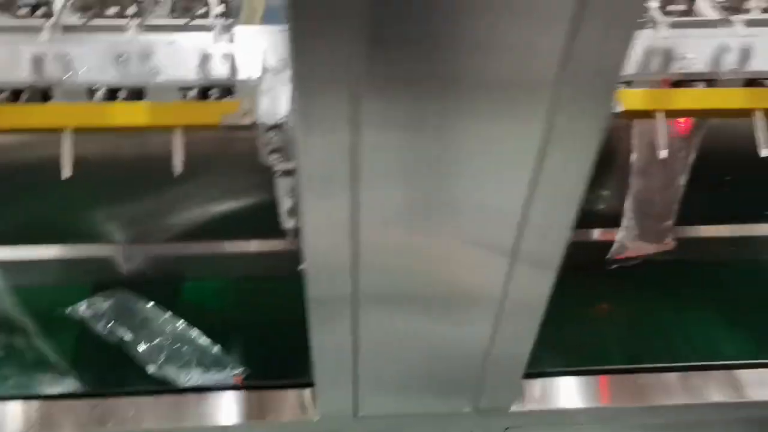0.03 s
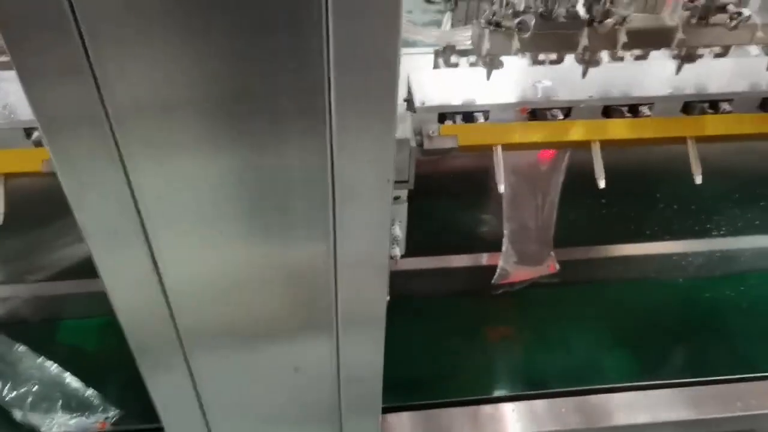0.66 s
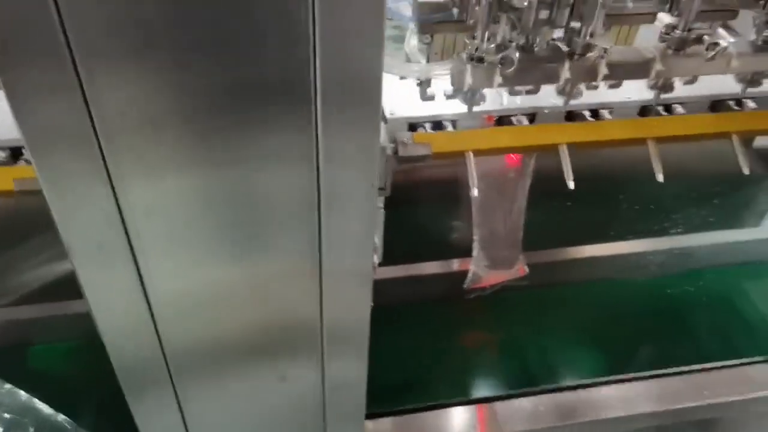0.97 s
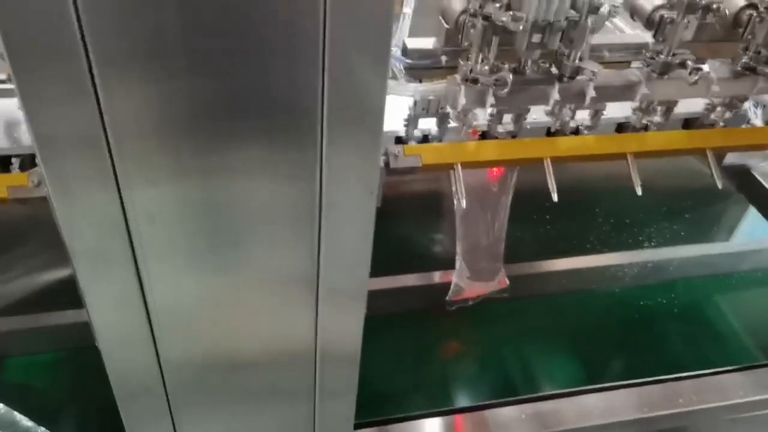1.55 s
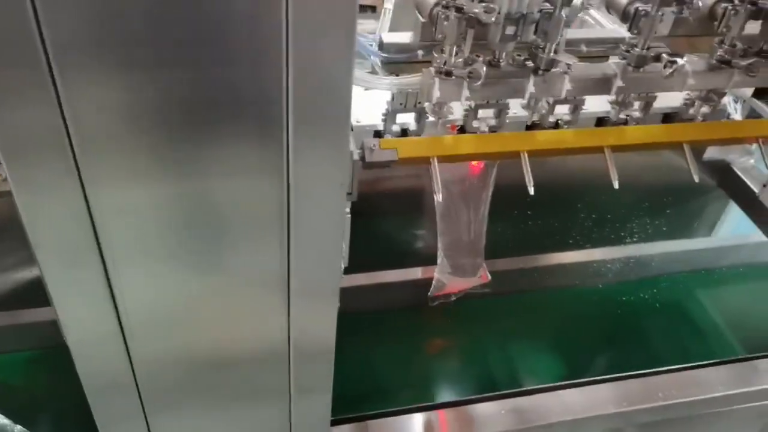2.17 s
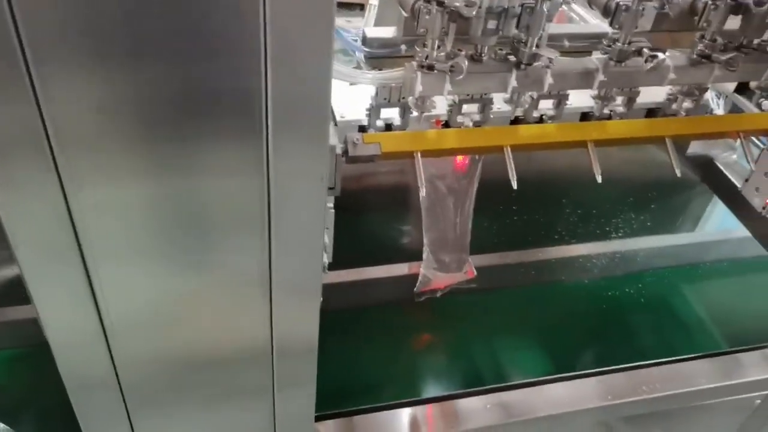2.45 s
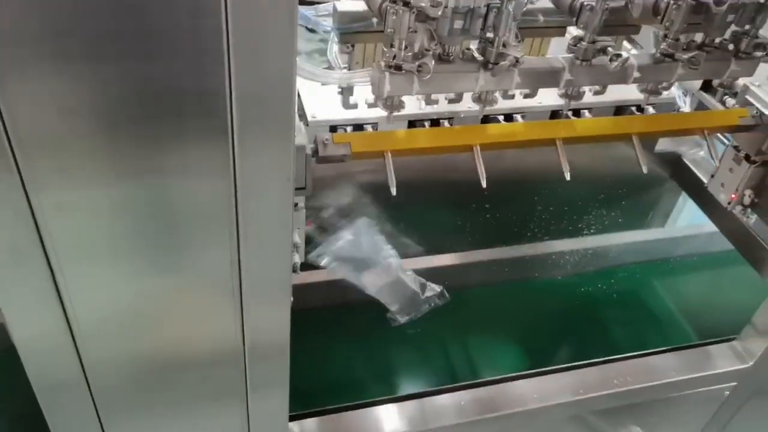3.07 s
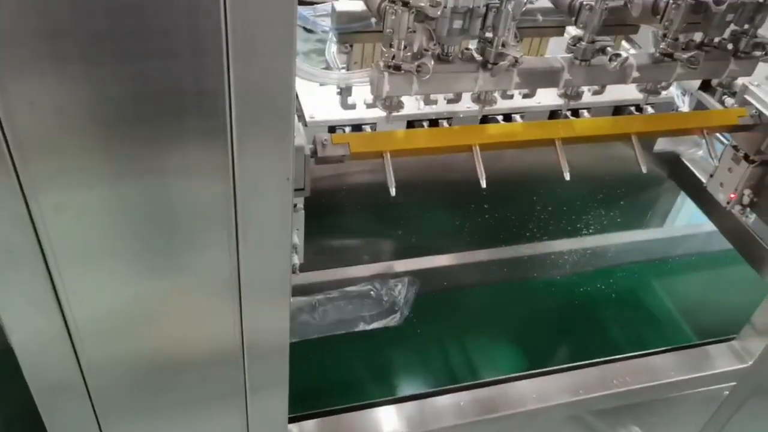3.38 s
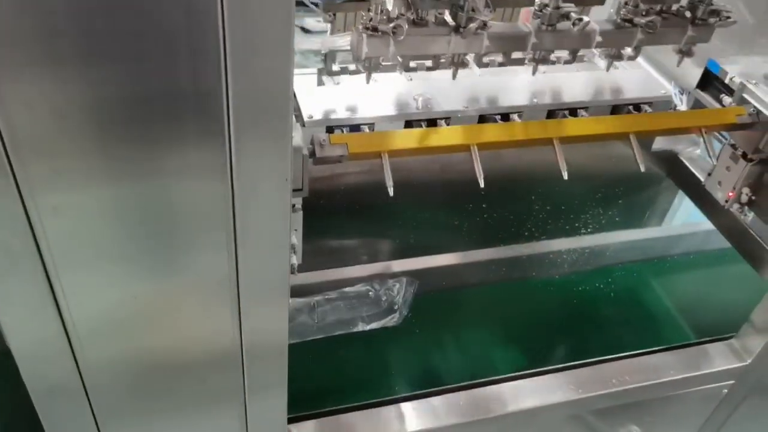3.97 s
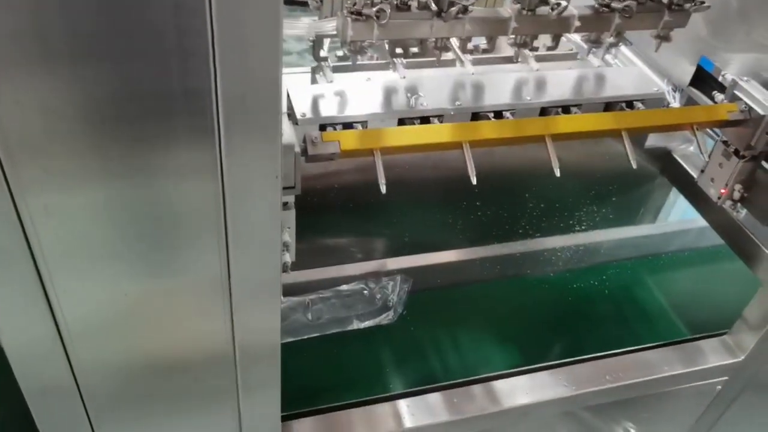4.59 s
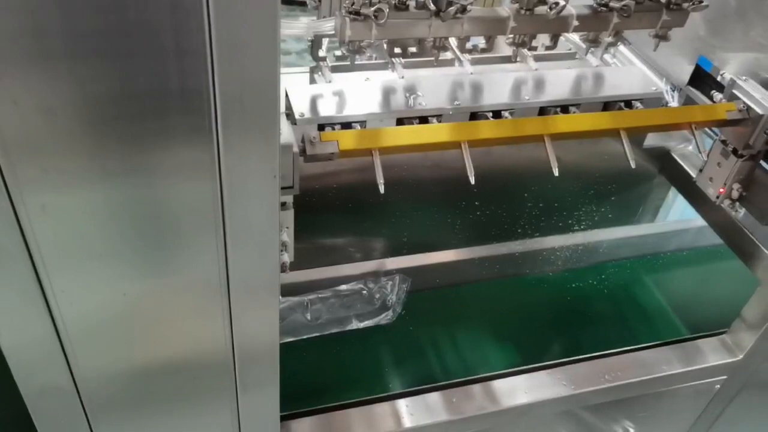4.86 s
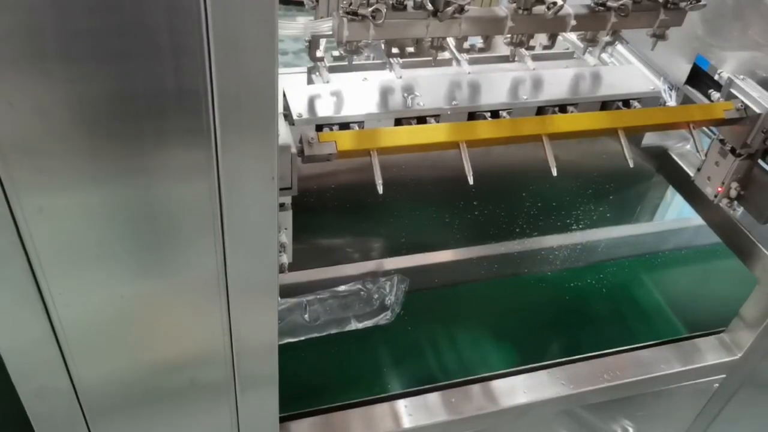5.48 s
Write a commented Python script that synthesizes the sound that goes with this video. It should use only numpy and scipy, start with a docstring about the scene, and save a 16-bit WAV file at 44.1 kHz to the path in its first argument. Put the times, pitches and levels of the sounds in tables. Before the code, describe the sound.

Close to a bag sealing machine in a factory, quick puffs of air cut through an electric hum and a thinly whistling leak. Jaws clank and thud shut as cylinders vent. After more air bursts and clacks, a slide rasps back and the hum and leak die away. A full plastic bag thumps and crinkles onto a belt, then a low motor rises and drops over the steady hall noise.

```python
"""A pneumatic machine fills and seals a plastic bag, heard in mono beside its steel cabinet in a noisy hall.
Its coils hum, its frame rumbles and air leaks and whistles, while valves puff, cylinders vent and the
jaws clank. A slide rasps back as the machine lets go, and hum and leak die away.
The full bag flops onto the conveyor belt, then a motor swells briefly."""
import sys
import numpy as np
from scipy import signal
from scipy.fft import rfft, irfft, next_fast_len
from scipy.io import wavfile
from scipy.ndimage import map_coordinates

SR = 44100
rng = np.random.default_rng(int(sys.argv[2]) if len(sys.argv) > 2 else 0)


def master(y):
    """Save y as 16-bit WAV."""
    cut = np.clip(np.atleast_2d(y).T, -1, 1)
    pcm = np.round(cut * 32767)  # scale
    wavfile.write(sys.argv[1], SR, pcm.astype(np.int16))


N = 248283


def amp(db):
    return 10 ** (np.asarray(db) / 20)


def unit(x):
    return x / np.sqrt(np.mean(x ** 2) + 1e-20)


def clock():
    return np.arange(N) / SR


def along(points, hz):
    """Read a curve of (frequency, value) points on a log frequency axis."""
    f, v = np.transpose(points)
    return np.interp(np.log(hz + 1), np.log(f + 1), v)


def wobble(rate):
    """Smooth random modulation, rate knots a second."""
    knots = rng.standard_normal(int(N * rate / SR) + 4)
    return map_coordinates(knots, [clock() * rate])


def filtered(x, response):
    """EQ x with a gain that is a function of frequency."""
    size = next_fast_len(N + 8192)
    return irfft(rfft(x, size) * response(np.fft.rfftfreq(size, 1 / SR)), size)[:N]


def noise(colour):
    """Noise of rms 1 with a (Hz, dB) spectrum, rippled by standing waves between the steel walls."""
    knots = rng.standard_normal(SR // 60)
    depth_db = [(200, 0), (900, 1.5), (3500, 1.5), (6000, 1)]
    ripple = lambda f: along(depth_db, f) * map_coordinates(knots, [f / 35])  # a knot every 35 Hz
    low_cut = lambda f: np.minimum(f / colour[0][0], 1) ** 2
    return unit(filtered(rng.standard_normal(N), lambda f: amp(along(colour, f) + ripple(f)) * low_cut(f)))


def resonant_noise(peaks, order=1):
    """Noise of rms 1 through (Hz, width, dB) resonances; a higher order has steeper skirts."""
    band = lambda f, hz, width: 1j * f * width / (hz * hz - f * f + 1j * f * width)
    body = lambda f: sum(amp(db) * band(f, hz, width) ** order for hz, width, db in peaks)
    return unit(filtered(rng.standard_normal(N), body))


def burst(start, t60, hold=0, attack=0.0012):
    """An envelope that opens, holds and dies away; all times in seconds."""
    t = np.maximum(clock() - start, 0)
    return (1 - np.exp(-t / attack)) * np.exp(-np.log(1000) * np.maximum(t - hold, 0) / t60)


def ring(start, modes, attack):
    """Strike (Hz, dB, t60) modes, in a slightly new balance each hit, starting near rms 1."""
    t = np.arange(SR) / SR
    out = np.zeros(N + SR)
    size = np.sqrt(sum(amp(db) ** 2 for _, db, _ in modes) / 2)
    for hz, db, t60 in modes:
        envelope = (1 - np.exp(-t / attack)) * np.exp(-np.log(1000) * t / t60)
        out[round(start * SR):][:SR] += amp(db + rng.normal(0, 1)) * envelope * np.sin(2 * np.pi * hz * t)
    return out[:N] / size


def harmonics(hz, lines):
    """A stack of (multiple, dB) sines on a pitch that may glide."""
    turns = np.cumsum(hz) / SR
    return np.sqrt(2) * sum(amp(db) * np.sin(2 * np.pi * (k * turns + rng.random())) for k, db in lines)


def shade(loss_db, clear_s=0.73):
    """Gain that rises to 1 as the microphone comes out from behind the cabinet."""
    return amp(-loss_db * np.exp(-clock() / clear_s))


def working(t60, let_go_s=2.878):
    """Full while the machine holds the bag, dying away once it lets go."""
    return np.exp(-np.log(1000) * np.maximum(clock() - let_go_s, 0) / t60)


def hum_level():
    """Envelope of the coils' buzz."""
    return amp(-30.5) * shade(loss_db=7) * working(t60=0.39)


# Partials of the coil buzz: (multiple of the buzz pitch, level [dB])
HUM_PARTIALS = [(1, 0), (1.5, -13), (2, -14.5), (3, -4), (3.5, -19.5), (4, -22)]

def hum():
    """Coils buzz at twice the mains rate until the machine lets go."""
    buzz_hz = 100 + 0.27 * wobble(5.36)
    return hum_level() * amp(0.82 * wobble(6.45)) * harmonics(buzz_hz, HUM_PARTIALS)


# Movements that shake the frame: (time [s], hold [s], level [dB])
FRAME_SHAKES = [(0.626, 0.24, -39), (1.068, 0.22, -27), (1.56, 0.053, -36), (2.05, 0.86, -35),
                (3.047, 0.78, -37), (5.247, 0.2, -36)]
# Low end of the shaking frame: (frequency [Hz], level [dB per Hz])
RUMBLE_EQ = [(25, -12), (42, -13), (55, -14), (68, -5.5), (85, -1), (115, 1.5), (150, 0), (200, -4.5),
             (270, -10), (350, -15.5), (500, -26.5), (900, -78)]
# Droning panel resonances: (frequency [Hz], width [Hz], level [dB])
DRONE_PEAKS = [(81.8, 3.2, -3), (148, 8.7, 2.5), (413, 4.3, -11)]

def rumble():
    """Each movement adds its power to the frame's idle rumble; the panels drone while the machine hums."""
    idle = amp(-39) * shade(loss_db=11)
    moves = [amp(db) * burst(s, t60=2.35, hold=hold, attack=0.017) for s, hold, db in FRAME_SHAKES]
    shake = np.sqrt(idle ** 2 + sum(move ** 2 for move in moves))
    drone = amp(-5.5) * np.sqrt(shake * hum_level()) * resonant_noise(DRONE_PEAKS)
    return shake * noise(RUMBLE_EQ) + drone


# The hall's noise bed: (frequency [Hz], level [dB per Hz])
HALL_EQ = [(210, 3), (350, 0.5), (700, -11), (1000, -7), (1220, -11.5), (1500, -7), (2250, -0.5),
           (2750, -7.5), (3200, -6.5), (3770, -12), (4900, -8), (5550, 1), (7100, -3), (8350, 3),
           (9300, -8), (10400, -13), (11400, -25), (13200, -24.5), (14000, -36)]
# Whines of other machines: (frequency [Hz], width [Hz], level [dB])
WHINE_PEAKS = [(815, 65, -4.5), (958, 26, -2.5), (1429, 25, 2.5), (1669, 30, 2), (1990, 9.7, -11),
               (2232, 40, 6), (5600, 110, -6)]

def hall():
    """A bed of factory noise, fluttering slightly, with other machines whining in it."""
    bed = amp(-37 + 0.42 * wobble(4.214) + 0.94 * wobble(25)) * noise(HALL_EQ)
    return bed + amp(-52) * resonant_noise(WHINE_PEAKS)


# Bright hiss of the leak: (frequency [Hz], level [dB per Hz])
LEAK_EQ = [(300, -27), (600, -11), (1200, -8), (2200, 0), (2700, -2), (3300, -1), (4200, -3.5), (5600, 3.5),
           (6300, 4), (7300, 0.5), (8500, 6), (9200, -18), (10500, -45), (11600, -59), (14000, -52)]

def leak():
    """Air leaks with a flickering hiss until the machine lets go."""
    return amp(-30 + 1.7 * wobble(18)) * shade(loss_db=0.5) * working(t60=0.75) * noise(LEAK_EQ)


# Whistles of the fittings: (start [s], end [s], frequency [Hz], width [Hz], level [dB])
FITTING_WHISTLES = [(-.3, 1.1, 4858, 30, -42), (1.3, 2.6, 4865, 50, -47), (1.2, 2.4, 6230, 90, -42.5),
                    (1.3, 2.9, 8058, 50, -38.5), (1.9, 3, 8510, 70, -40), (.2, 1.6, 3008, 30, -51)]

def whistles():
    """The air fittings whistle in turn as pressure shifts: narrow bands of hiss that swell and fade."""
    out = np.zeros(N)
    for start, end, hz, width, db in FITTING_WHISTLES:
        swell = np.sin(np.pi * np.clip((clock() - start) / (end - start), 0, 1))
        out += amp(db) * swell * resonant_noise([(hz, width, 0)])
    return out


# Valve exhaust cues: (time [s], attack [s], hold [s], level [dB], t60 [s], muffler name)
VALVE_PUFFS = [(.057, .002, 0.013, -26, 0.52, "hissing"), (.1415, 0.0018, 0.021, -20.5, 0.36, "hissing"),
               (0.296, .0004, 0.051, -24.5, 0.2, "hissing"), (.411, .002, 0.013, -28.5, 1, "hissing"),
               (0.874, 0.0049, 0.046, -21, 0.35, "whistling")]
# Tone of the exhaust jet: (frequency [Hz], level [dB per Hz])
PUFF_EQ = [(800, -33), (1800, -13.5), (2700, -9), (3800, -11), (5100, -4.5), (5700, 5), (6500, 0.5),
           (7300, 0.5), (8200, 3.5), (9000, -4.5), (10500, -20), (11600, -40), (14000, -50)]
# Ring of the "hissing" and "whistling" mufflers: (frequency [Hz], width [Hz], level [dB])
MUFFLER_PEAKS = { "hissing": [(3050, 60, -7), (4120, 45, -.5), (4290, 45, -2), (4600, 45, -4),
                 (5670, 45, 2), (5890, 45, 2), (6250, 35, -1), (6520, 35, -1), (7620, 40, 1),
                 (8040, 40, 0)], "whistling": [(3010, 35, -1), (2780, 50, -3), (3330, 50, -2),
                 (3600, 45, -2), (3850, 50, -3.5), (5680, 45, 0), (6310, 45, 3), (6930, 30, 8.5),
                 (8540, 45, -1)], }

def puffs():
    """Each valve opens with a surge of extra flow and blows through its muffler, which rings."""
    jet = noise(PUFF_EQ) * amp(1.1 * wobble(160))
    out = np.zeros(N)
    for s, attack, hold, db, t60, muffler in VALVE_PUFFS:
        surge = 1 + 0.59 * burst(s, t60=0.057, attack=attack)
        blowing = burst(s, t60, hold, attack) * surge
        ringing = amp(-5) * burst(s, t60=0.22, hold=hold, attack=attack)
        out += amp(db) * (blowing * jet + ringing * resonant_noise(MUFFLER_PEAKS[muffler], order=2))
    return out


# Cylinder vent cues: (time [s], hold [s], jet level [dB], sizzle level [dB])
CYLINDER_VENTS = [(1.02, 0.042, -26.5, -55), (1.09, 0.069, -26.5, -35), (1.215, 0.135, -23, -45),
                  (2.125, .015, -43, -41), (2.17, 0.09, -54, -56), (2.615, 0.04, -26, -30),
                  (2.745, 0.115, -29.5, -47)]
# Body of the jet: (frequency [Hz], level [dB per Hz])
VENT_EQ = [(400, -5.5), (1300, -12), (2100, -3.5), (3000, -2.5), (4000, -5.5), (5200, 1.5), (6300, 3),
           (7300, 0.5), (8500, 6), (9500, -7), (11000, -17), (14000, -35)]
# Thin top edge of the jet: (frequency [Hz], level [dB per Hz])
SIZZLE_EQ = [(6000, -25), (8400, 10), (9400, 0), (10300, -1), (11100, -6), (11800, -21), (13300, -16),
             (14000, -20)]

def vents():
    """Cylinders dump their air as the jaws close and open: a broad jet with a sizzling edge."""
    jet = noise(VENT_EQ)
    sizzle = unit(noise(SIZZLE_EQ) * amp(2.5 * wobble(300)))
    out = np.zeros(N)
    for s, hold, jet_db, sizzle_db in CYLINDER_VENTS:
        out += burst(s, t60=0.55, hold=hold, attack=0.01) * (amp(jet_db) * jet + amp(sizzle_db) * sizzle)
    return amp(0.7 * wobble(49.13)) * out


# Hits of the jaws and grippers: (time [s], thud [dB], clang [dB], clack [dB], tick [dB])
JAW_HITS = [(1.0755, -35, -31, -14.5, -22), (1.086, -4, -25, -37, -37), (1.106, -30, -25, -25, -37),
            (1.112, -8, -38, -38, -40), (1.141, -8, -30, -36, -23.5), (1.157, -5.5, -49, -45, -42),
            (1.179, -2, -32, -44, -38), (1.498, -13, -37.5, -31, -27), (1.598, -10, -52, -48, -45),
            (1.626, -11, -55, -48, -45), (1.664, -14, -59, -48, -47), (2.145, -32, -42, -29, -21),
            (2.722, -30, -38, -27.5, -30), (2.763, -30, -33, -30, -26), (2.769, -32, -35, -29, -25),
            (2.783, -16, -50, -42, -42), (2.807, -32, -42, -34, -28), (2.817, -34, -41, -32, -33)]
# Dull thud of the damped sheet panels: (frequency [Hz], level [dB], t60 [s])
PANEL_MODES = [(82, -14, .12), (146, 0, .06), (185, -4, .045), (235, -10, .04), (335, -15, .05)]
# Long ring of the frame: (frequency [Hz], level [dB], t60 [s])
FRAME_MODES = [(403, 0, .9), (623, -2, .8), (771, -1, .7), (945, 0, .6), (993, -6, .5), (1006, 0, .65),
               (1240, -5, .5), (1515, 0, .8), (1755, -5, .8), (1975, -1.5, .8), (2090, -4, .8),
               (2520, -2, .8), (3252, -10, .7)]
# Short ring of the steel latch: (frequency [Hz], level [dB], t60 [s])
LATCH_MODES = [(2083, 0, .12), (2213, -4, .11), (2374, -1, .05), (2530, -6, .06), (2977, -4, .055),
               (3155, -7, .055)]
# Dark clang of the frame: (frequency [Hz], level [dB per Hz])
CLANG_EQ = [(150, 15), (330, 10), (550, 5), (1000, 3), (1500, 4), (2200, -1), (4000, -19), (8000, -45)]
# Sharp midrange clack: (frequency [Hz], level [dB per Hz])
CLACK_EQ = [(700, -10), (1800, -9.5), (2100, 0), (2500, -4.5), (3100, -6.5), (3800, -16), (8000, -25),
            (14000, -55)]
# Bright tick, also the tone of the bag's crackle: (frequency [Hz], level [dB per Hz])
TICK_EQ = [(2000, -22), (4500, -10), (6000, 3), (7400, -4), (8500, 9), (9500, -7.5), (11500, -13.5),
           (14000, -32)]

def jaws():
    """Each hit thuds in the panels, rings the latch and clangs in the frame, which rings on as they shut."""
    clang, clack, tick = noise(CLANG_EQ), noise(CLACK_EQ), noise(TICK_EQ)
    rattle = amp(2.5 * wobble(180))  # loose parts chatter after the hit
    shut_s = JAW_HITS[2][0]
    out = amp(-28 + 2 * wobble(45)) * ring(shut_s, FRAME_MODES, attack=0.001)
    thuds = np.zeros(N)
    for s, thud_db, clang_db, clack_db, tick_db in JAW_HITS:
        thuds += amp(thud_db) * ring(s, PANEL_MODES, attack=0.0054)
        out += amp(clang_db) * rattle * clang * burst(s, t60=0.22)
        out += amp(clack_db) * clack * burst(s, t60=0.097, attack=0.0008)
        out += amp(clack_db - 7) * ring(s, LATCH_MODES, attack=0.002)
        out += amp(tick_db) * tick * burst(s, t60=0.06)
    low_cut = signal.butter(3, 97, "highpass", fs=SR, output="sos")  # panels radiate little deep bass
    return out + signal.sosfilt(low_cut, thuds)


# Bass boom of the cabinet: (frequency [Hz], level [dB per Hz])
BOOM_EQ = [(30, -45), (55, -28), (70, -3), (86, 7), (105, -33), (300, -120)]

def cabinet_boom():
    """The cabinet booms while the jaws press."""
    return amp(-34) * burst(1.17, t60=0.42, hold=0.37, attack=0.049) * noise(BOOM_EQ)


# Gripper cues: (time [s], knock level [dB], rub hold [s], rub level [dB])
STOP_HITS = [(2.135, -31, .03, -36.5), (2.8025, -15, 0.011, -27), (2.843, -29, .008, -41)]
# Resonances of the end stop: (frequency [Hz], width [Hz], level [dB])
STOP_PEAKS = [(373, 55, 1), (453, 64, -2), (531, 30, 2), (636, 32, 2.5), (710, 31, 5), (777, 42, 2.5),
              (1240, 40, -10), (1437, 35, -2)]

def end_stop():
    """The gripper knocks on its stop; the same resonances sound on as it rubs into the cushion."""
    modes = [(hz, db, np.log(1000) / (np.pi * width)) for hz, width, db in STOP_PEAKS]  # width to t60
    knocks = sum(amp(db) * ring(s, modes, attack=0.0015) for s, db, _, _ in STOP_HITS)
    rubbing = sum(amp(db) * burst(s, t60=0.2, hold=hold, attack=0.004) for s, _, hold, db in STOP_HITS)
    return knocks + rubbing * resonant_noise(STOP_PEAKS, order=2)


# Rasp of the slide on its rail: (frequency [Hz], width [Hz], level [dB])
SLIDE_PEAKS = [(504, 120, 7), (780, 130, -3), (1603, 140, 6.5), (2030, 82, 12.5), (2250, 63, 9.5),
               (2350, 67, -23)]

def slide():
    """A slide rubs back along its rail at an even speed, then stops."""
    stroke = burst(2.71, t60=0.32, hold=1, attack=0.033)
    return amp(-41 + 1.6 * wobble(40)) * stroke * resonant_noise(SLIDE_PEAKS)


# The bag's hits on the belt: (time [s], thump [dB], film slap [dB], snap [dB])
BAG_HITS = [(3.2626, -17.5, -35, -21.5), (3.2652, -31, -39, -30), (3.274, -13.5, -38, -26),
            (3.288, -24, -44, -44), (3.299, -21, -40, -44), (3.321, -18.5, -38, -44),
            (3.341, -28, -40, -38), (3.398, -27, -44, -40), (3.43, -30, -49, -45)]
# Low slosh of the filling: (frequency [Hz], width [Hz], level [dB])
FILLING_PEAKS = [(184, 31, -3), (238, 32, 8), (335, 28, 3), (368, 27, -5), (534, 90, -12), (746, 41, -15)]
# Thump of the belt: (frequency [Hz], level [dB], t60 [s])
BELT_MODES = [(145, -4, .07), (186, -2, .08), (236, 2, .11), (280, 2, .08), (333, 2, .09), (382, -5, .05),
              (450, -10, .04), (600, -15, .04)]
# Slap of the plastic film: (frequency [Hz], level [dB per Hz])
FILM_EQ = [(200, -7), (750, 0), (1200, -5.5), (1800, 0), (2600, 4.5), (3800, -6), (5500, 0), (7300, 3),
           (8500, 1), (9600, -4), (11500, -18), (14000, -34)]

def bag_landing():
    """The bag's foot brushes the belt, then it thumps down, its filling shaking and its film snapping."""
    brush = amp(-29.5) * burst(3.09, t60=0.33, hold=0.046, attack=0.008)
    jolt = amp(-30.5) * burst(BAG_HITS[1][0], t60=0.58, hold=0.073, attack=0.0041)
    out = (brush + jolt) * resonant_noise(FILLING_PEAKS, order=2)
    film = unit(noise(FILM_EQ) * amp(1.8 * wobble(500)))
    for s, thump_db, slap_db, snap_db in BAG_HITS:
        slap = amp(slap_db) * burst(s, t60=0.18)
        snap = amp(snap_db) * burst(s, t60=0.031, attack=0.00024)
        out += amp(thump_db) * ring(s, BELT_MODES, attack=0.0024) + (slap + snap) * film
    return out


# Folds of the film: (time [s], hold [s], level [dB])
BAG_FOLDS = [(3.294, 0.032, -30.5), (3.339, .004, -32)]
# Hollow ring of the bag's wall: (frequency [Hz], width [Hz], level [dB])
WALL_PEAKS = [(615, 50, -2), (740, 70, 4), (837, 74, -2)]

def bag_crumple():
    """The film crackles and the bag's wall rings as it folds over and lies down."""
    folding = sum(amp(db) * burst(s, t60=0.18, hold=hold, attack=0.002) for s, hold, db in BAG_FOLDS)
    crackle = unit(noise(TICK_EQ) * amp(1.8 * wobble(700)))
    return folding * (crackle + amp(-9.5) * resonant_noise(WALL_PEAKS, order=2))


# Fader moves for the motor's run: (time [s], shaft tone level [dB], overtone level [dB])
MOTOR_FADERS = [(4.45, -44, -47), (4.462, -49, -61), (4.5, -51, -42), (4.622, -45, -42),
                (5.006, -39, -28.5), (5.126, -36, -35), (5.298, -34, -26), (5.41, -44, -29.5),
                (5.45, -45, -34)]
# The motor's overtones: (multiple of the shaft rate, level [dB])
MOTOR_PARTIALS = [(2, 0.5), (3, -14), (4, -24.5), (6, -24.5)]

def motor():
    """A motor gains a little speed, surges twice and drops away as it is switched off."""
    on_s, off_s = 4.24, 5.42
    top_hz, rise_hz_per_s = 54.4, 1.1
    s, shaft_db, overtones_db = np.transpose(MOTOR_FADERS)
    shaft_hz = top_hz - rise_hz_per_s * np.maximum(off_s - clock(), 0)
    shaft = amp(np.interp(clock(), s, shaft_db)) * harmonics(shaft_hz, [(0.98, 0)])  # slightly flat
    overtones = amp(np.interp(clock(), s, overtones_db)) * harmonics(shaft_hz, MOTOR_PARTIALS)
    return burst(on_s, t60=0.4, hold=off_s - on_s, attack=0.12) * (shaft + overtones)


# Decay of the hall's reverb: (frequency [Hz], t60 [s])
REVERB_DECAY = [(150, 0.53), (1000, 0.45), (5000, 0.051), (12000, 0.16)]

def reverb(x):
    """The hall answers with a short noise tail whose treble dies first."""
    hz, t, spectrum = signal.stft(rng.standard_normal(SR // 2), SR, nperseg=256)
    decay = np.exp(-np.log(1000) * t / along(REVERB_DECAY, hz)[:, None])
    _, tail = signal.istft(spectrum * decay, SR, nperseg=256)
    delayed = np.pad(x, (SR // 200, 0))  # 5 ms pre-delay
    return signal.fftconvolve(delayed, tail / np.linalg.norm(tail))[:N]


def scene():
    """Air and action feed the reverb; hum, low end, hall and motor stay dry."""
    air = leak() + whistles() + puffs() + vents()
    near = air + jaws() + end_stop() + slide() + bag_landing() + bag_crumple()
    bed = hum() + rumble() + hall() + cabinet_boom() + motor()
    mono = amp(-3) * near + amp(-12) * reverb(near) + bed
    return np.array([mono, mono])


def record(dry):
    """The microphone sheds deep bass, and a brick-wall filter takes off the very top."""
    low_hz, top_hz = 42, 14060
    low_cut = signal.butter(2, low_hz, "highpass", fs=SR, output="sos")
    return np.array([filtered(channel, lambda hz: hz < top_hz) for channel in signal.sosfilt(low_cut, dry)])


dry = scene()
out = record(dry)
master(out)
```